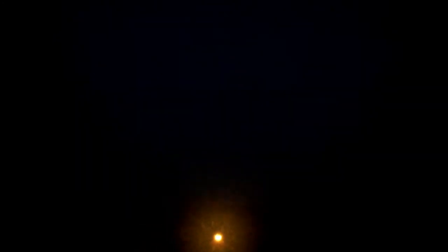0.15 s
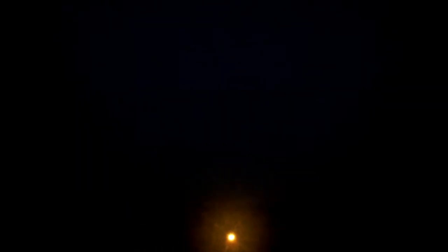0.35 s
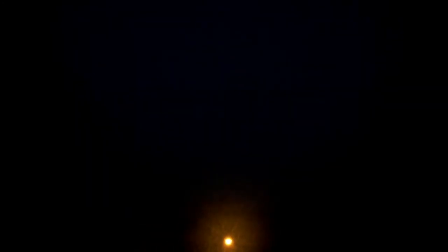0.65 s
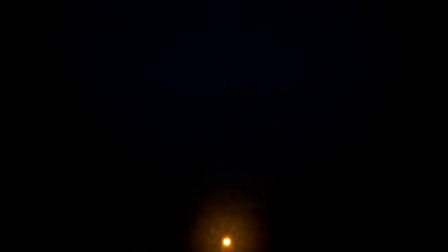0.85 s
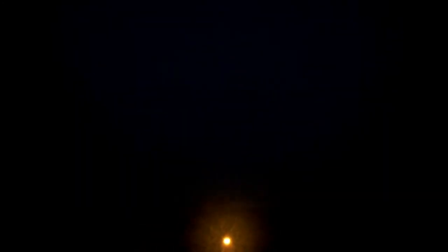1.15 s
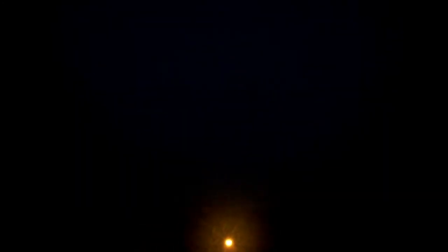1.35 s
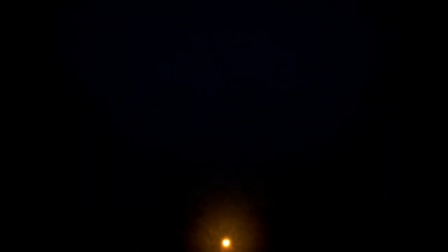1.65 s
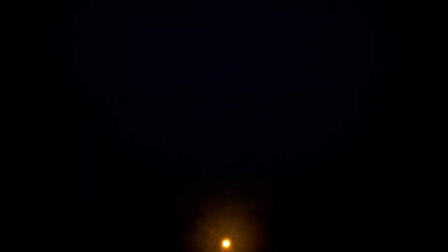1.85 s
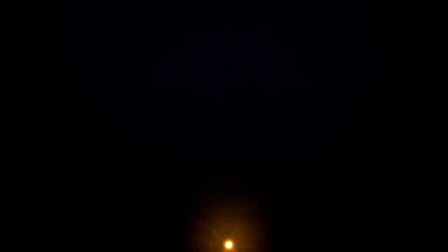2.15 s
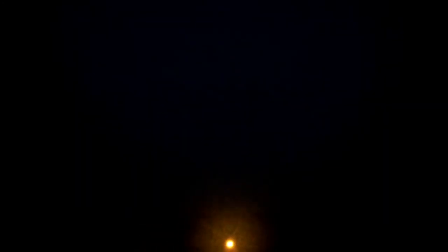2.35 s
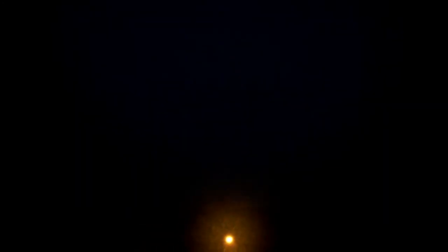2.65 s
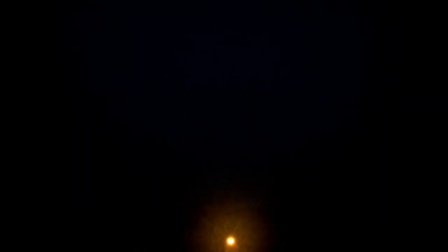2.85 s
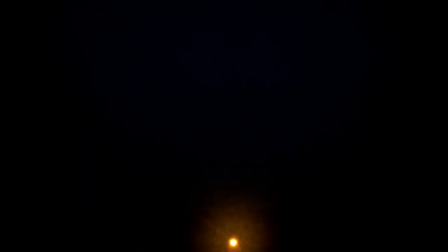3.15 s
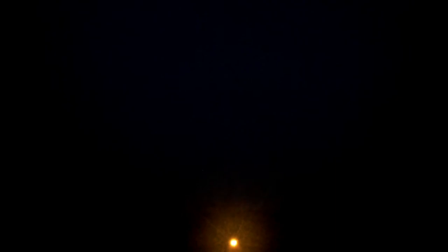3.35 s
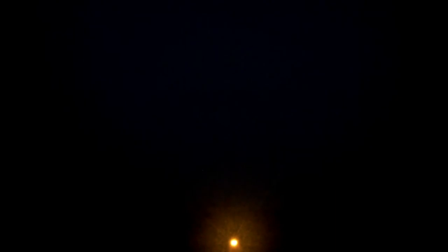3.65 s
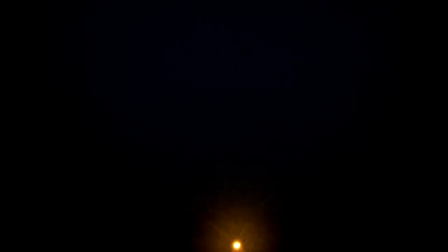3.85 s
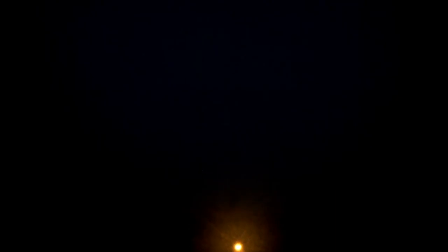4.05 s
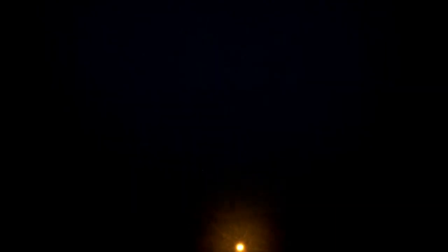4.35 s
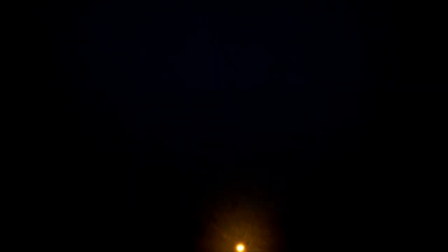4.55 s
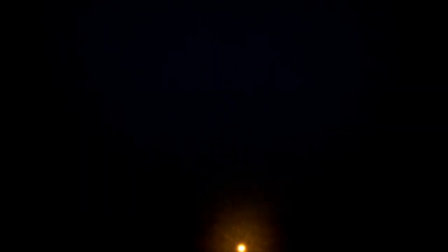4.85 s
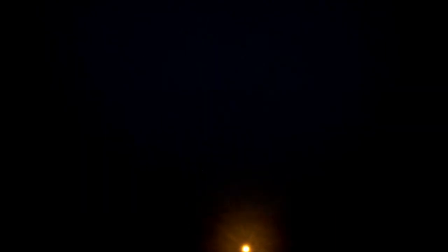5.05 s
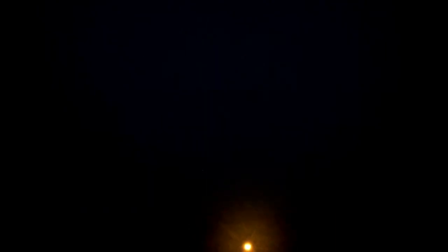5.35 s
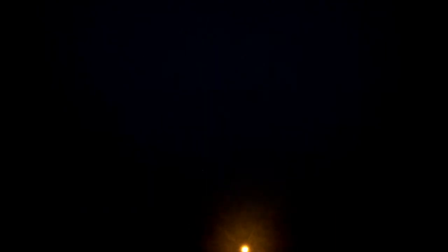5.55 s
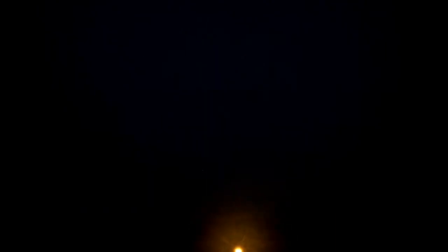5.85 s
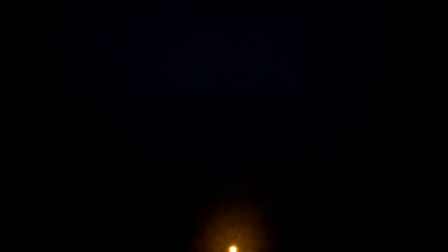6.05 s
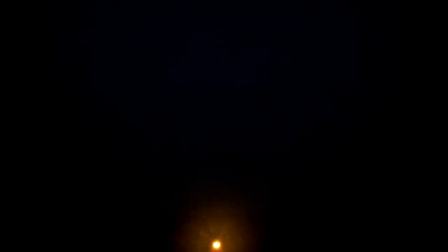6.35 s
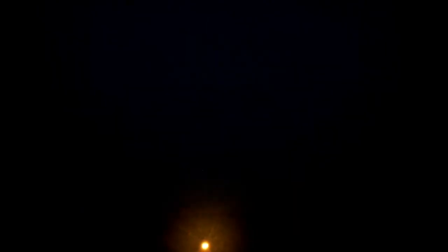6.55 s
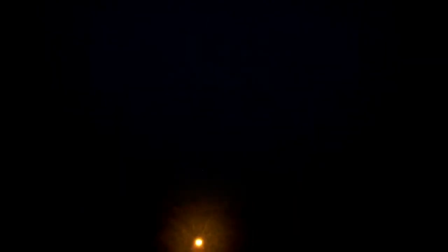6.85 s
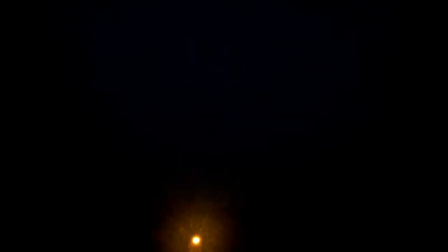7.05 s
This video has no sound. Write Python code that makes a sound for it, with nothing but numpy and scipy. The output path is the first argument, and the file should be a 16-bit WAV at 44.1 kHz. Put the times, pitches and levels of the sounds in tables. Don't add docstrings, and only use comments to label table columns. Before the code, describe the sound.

For about seven seconds, steady rain falls outdoors at night, picked up by a small handheld microphone, essentially mono. The bed is an even, slightly resonant hiss of far drops with dense, fine crackling from nearer ones. Single close drops tick sharply above it: a pair near 0.2, a clear one at 1.7, several between 2.2 and 3.6, more from 4.3 to 5.7, and a cluster after 6.1, some bright, some dull. At 0.9 a finger knocks the case: a very loud, short, clipped thump with a brief hollow ring and small release click. Soft low grip bumps follow around 1.3 to 1.4, with fainter nudges near 1.7, 3.2 and 4.2. Deep wind rumble swells briefly and irregularly underneath, strongest in the first couple of seconds. Near 7.1 the case rocks gently again with a dull last tap as the rain eases barely perceptibly.

```python
import sys
import numpy as np
from scipy import signal
from scipy.fft import rfft, irfft
from scipy.io import wavfile
from scipy.ndimage import uniform_filter1d

SR = 44100
rng = np.random.default_rng(int(sys.argv[2]) if len(sys.argv) > 2 else 0)


def voltage_ratio(level):
    return 10 ** (np.asarray(level, float) / 20)


def persist_wave(psi):
    counts = np.round(np.clip(psi, -1, 1) * 32767).astype(np.int16)
    wavfile.write(sys.argv[1], SR, np.atleast_2d(counts).T)


N = 317079

# time in seconds, level in dB.
SHOWER_LEVEL = [
    (0.0, -33),
    (0.46, -33.5),
    (2.76, -33),
    (6.85, -33),
    (7.19, -34),
]
# low edge in Hz, high edge in Hz, splash decay in ms, splash level in dB.
DROP_REGISTERS = [
    (1300, 4200, 1.5, -17.0),
    (4200, 8600, 1.2, -18.0),
    (8600, 14500, .7, -24.0),
]
# time in seconds, peak in dB, brightness in dB.
CLOSE_DROPS = [(0.1655, -16.7, 2), (0.1709, -15.0, 3), (1.6837, -13.3, 0), (1.6867, -19.2, -6),
               (2.1708, -17.4, -11), (2.5509, -17.3, -7), (2.7246, -15.2, -9), (2.7896, -15.7, -1),
               (3.1452, -16.2, -11), (3.4891, -19.2, -5), (3.4967, -18.9, -19), (3.5749, -18.5, -9),
               (4.2675, -18.3, -15), (4.4941, -19.2, -6), (4.4975, -17.1, -12), (4.5396, -19.0, -10),
               (5.12, -19.2, -9), (5.1784, -19.2, -2), (5.4519, -19.0, 3), (5.7434, -18.1, -6),
               (6.1544, -15.4, -4), (6.2545, -15.3, -4), (6.5915, -19.2, -9), (6.6088, -18.0, 0),
               (6.6456, -17.3, -19), (6.901, -22.0, -28), (6.917, -22.0, -30), (6.924, -22.0, -30),
               (7.0698, -18.7, 4), (7.1055, -17.3, 8)]
# frequency in Hz, level in dB.
PORT_COLOUR = [(120, -85.5), (640, -87.5), (840, -75), (1200, -80), (1930, -69.5), (3100, -77.5),
               (5400, -76.5), (6600, -69), (7350, -71), (8750, -79), (9500, -73.5), (11500, -77),
               (13800, -86), (15600, -90.5)]
# start in seconds, pressure (1 = full scale), rise in ms, fall in ms, case ring 0-1.
FINGER_KNOCK = [
    (.8957, -.2, 1.7, 1.0, 0.),
    (.8969, -2.1, 1.6, 5.2, .27),
    (.9016, -.28, 1.5, 4.6, 0.),
    (.9225, .24, 4.5, 42.0, 0.),
    (.9245, .035, .8, 1.0, .9),
]
# start in seconds, pressure (1 = full scale), length in ms.
GRIP_NUDGES = [
    (.252, -.1, 20),
    (1.370, .15, 8),
    (1.383, .07, 8),
    (1.389, .08, 7),
    (1.395, .06, 13),
    (1.404, -.1, 18),
    (1.669, -.08, 14),
    (3.245, .03, 16),
    (4.194, .06, 13),
]
# start in seconds, pressure (1 = full scale), case ring (ratio).
LIGHT_TAPS = [
    (.2475, -.024, .9),
    (1.289, .002, 5.0),
    (1.328, .002, 8.0),
    (4.93, .002, 6.0),
    (6.254, .004, 2.0),
    (7.188, -.025, .3),
]
# start in seconds, strength (ratio).
CASE_ROCKS = [
    (1.319, 1.),
    (7.125, .75),
]
# frequency in Hz, level in dB, 60 dB decay in seconds.
CASE_MODES = [
    (328, -12, 0.034),
    (580, -12, 0.044),
    (816, 6.5, 0.018),
    (1100, 1.5, 0.012),
    (1322, 5.5, 0.02),
]
# centre in seconds, rumble in dB, length in seconds, buffeting in dB.
WIND_GUSTS = [(0.082, -27.5, 0.1, -56), (0.24, -29, .13, -46), (0.448, -24.5, 0.023, -41),
              (0.618, -24, 0.16, -53), (0.804, -28, 0.23, -54), (1.19, -43, 0.059, -46),
              (1.28, -24.5, 0.12, -45), (1.607, -27, 0.12, -57), (1.67, -40, .05, -40),
              (1.863, -32.5, 0.25, -60), (2.102, -21, 0.068, -61), (2.335, -23, 0.11, -49),
              (2.65, -35, .15, -62), (3.062, -32.5, 0.07, -46), (3.287, -29.5, 0.14, -51),
              (3.478, -27.5, 0.04, -59), (4.198, -31, 0.1, -52), (4.923, -26.5, 0.12, -50),
              (5.44, -30, 0.11, -59), (5.58, -29.5, 0.12, -62), (6.064, -30, 0.073, -58),
              (6.25, -29.5, 0.27, -62), (6.75, -27, 0.093, -52), (6.904, -36, .08, -65),
              (7.043, -32, 0.1, -60), (7.123, -29, .04, -62), (7.19, -34, .03, -44)]

LESSER_COUNT, LESSER_PEAK_DB, LESSER_BRIGHT_DB, LESSER_SPREAD_DB = 36, -20.0, -7.0, 6.0
NUDGE_RISE_RATIO = 0.55
TAP_RISE_MS, TAP_FALL_MS = 1.0, 1.6
ROCK_HALF_S, ROCK_PULL, ROCK_PUSH = 0.0135, -0.075, 0.21
AIR_LEAK_HZ = 5.5
CALM_RUMBLE_DB, CALM_BUFFET_DB, RUMBLE_WANDER_DB, BUFFET_WANDER_DB = -33.5, -51.5, 1, 3
COUPLING_HZ, MISMATCH_DB, SELF_NOISE_DB = 4.5, -0.035, -54.5
PORT_FFT_SIZE = 8192


def rain(response):
    near = patter(per_s=1500.0, spread_db=2.5, clump_db=1.5, colour_db=2.5)
    fall = hiss(flicker_db=0.65) + voltage_ratio(-7.5) * near
    time_s, level_db = np.transpose(SHOWER_LEVEL)
    shower_db = np.interp(np.arange(N) / SR, time_s, level_db)
    return voltage_ratio(shower_db + 0.11) * rms_one(signal.fftconvolve(fall, response)[:N])


def hiss(flicker_db):
    white = rng.standard_normal((2, N))
    low = cut(white[0], 4160, "low", order=2) * voltage_ratio(flicker_db * drift(16.0))
    high = cut(white[1], 4500, "high", order=2) * voltage_ratio(flicker_db * drift(26.0))
    return (low + high) * voltage_ratio(0.12 * drift(5.9))


def patter(per_s, spread_db, clump_db, colour_db):
    born = rng.random(N) < per_s * voltage_ratio(clump_db * drift(9.0)) / SR
    size_db = spread_db * rng.exponential(1, N) + colour_db * rng.standard_normal((3, N))
    size_db = np.minimum(size_db, 11.5)
    register_db = [[-5.0], [-1.0], [-1.5]]
    return rms_one(splash(born * rng.choice([-1, 1], N), size_db + register_db))


def close_drops(response):
    time_s, peak_db, bright_db = drop_rows()
    at = (time_s * SR).astype(int)
    clicks, gains_db = np.zeros(N), np.zeros((3, N))
    clicks[at] = voltage_ratio(peak_db + 4.0) * rng.choice([-1, 1], len(at))
    low_db = -13.0 - 0.63 * np.minimum(bright_db + 15.0, 0)
    middle_db = -0.55 * np.maximum(bright_db + 5.0, 0)
    top_db = -1.5 + 1.1 * np.minimum(bright_db, 1.5)
    gains_db[:, at] = [low_db, middle_db, top_db]
    peak_response = response / np.abs(response).max()
    return signal.fftconvolve(splash(clicks, gains_db), peak_response)[:N]


def drop_rows():
    time_s = rng.random(LESSER_COUNT) * (N - 1) / SR
    bright_db = LESSER_BRIGHT_DB + LESSER_SPREAD_DB * rng.standard_normal(LESSER_COUNT)
    peak_db = LESSER_PEAK_DB - 0.5 + rng.random(LESSER_COUNT)
    return np.hstack([np.transpose(CLOSE_DROPS), [time_s, peak_db, bright_db]])


def splash(clicks, gains_db):
    out = 0
    for (low_hz, high_hz, decay_ms, splash_db), gain_db in zip(DROP_REGISTERS, gains_db):
        tail_ms = np.arange(256) * 1000 / SR
        tail = voltage_ratio(splash_db) * rng.standard_normal(256) * np.exp(-tail_ms / decay_ms)
        tail[0] = 1
        spatter = signal.fftconvolve(clicks * voltage_ratio(gain_db), tail)[:N]
        out = out + cut(spatter, [low_hz, high_hz], "band", order=1)
    return out


def port_response():
    hz, db = np.transpose(PORT_COLOUR)
    half = PORT_FFT_SIZE // 2
    grid_hz = np.arange(half + 1) * SR / PORT_FFT_SIZE + 1
    level_db = np.interp(np.log(grid_hz), np.log(hz), db)
    broad_db = uniform_filter1d(level_db, size=70)
    narrow_db = uniform_filter1d(level_db, size=14)
    level_db = np.where(grid_hz > 3500, broad_db, narrow_db)
    cepstrum = irfft(level_db * np.log(10) / 20)
    cepstrum[1:half] *= 2
    cepstrum[half + 1:] = 0
    response = irfft(np.exp(rfft(cepstrum)))[:half // 2]
    return response / np.sqrt(np.sum(response ** 2))


def handling():
    t, squeeze, release = np.arange(N) / SR, np.zeros(N), np.full(N, 1e-18)
    for start_s, pressure, rise_ms, fall_ms, ring in pushes():
        top_s = start_s + rise_ms / 1000
        end_s = start_s + (rise_ms + fall_ms) / 1000
        phase = np.interp(t, [start_s, top_s, end_s], [0, np.pi, 2 * np.pi])
        squeeze += pressure * (1 - np.cos(phase)) / 2
        release_s = start_s + (rise_ms + 0.6 * fall_ms) / 1000
        release[min(int(release_s * SR), N - 1)] = -pressure * ring
    release = cut(release, 3200, "low", order=2)
    out = cut(squeeze, AIR_LEAK_HZ, "high", order=1)
    for hz, level_db, t60_s in CASE_MODES:
        radius, angle = voltage_ratio(-60 / (t60_s * SR)), 2 * np.pi * hz / SR
        poles = [1, -2 * radius * np.cos(angle), radius * radius]
        out += voltage_ratio(level_db - 16.0) * signal.lfilter([0, np.sin(angle)], poles, release)
    return out


def pushes():
    half_ms = ROCK_HALF_S * 1000
    rows = list(FINGER_KNOCK)
    for start_s, strength in CASE_ROCKS:
        for k, pressure in enumerate([ROCK_PULL, ROCK_PUSH, ROCK_PULL, ROCK_PUSH]):
            rows.append((start_s + k * ROCK_HALF_S, strength * pressure, 0.8 * half_ms, 0.65 * half_ms, 0.0))
    for start_s, pressure, length_ms in GRIP_NUDGES:
        rise_ms = NUDGE_RISE_RATIO * length_ms
        rows.append((start_s, pressure, rise_ms, length_ms - rise_ms, 0.0))
    for start_s, pressure, ring in LIGHT_TAPS:
        rows.append((start_s, pressure, TAP_RISE_MS, TAP_FALL_MS, ring))
    return rows


def wind():
    rumble_db, buffet_db = gusts()
    rumble = voltage_ratio(rumble_db - 1.0) * lumpy(6.7, 42.0, order=5, even_s=0.122)
    return rumble + voltage_ratio(buffet_db - 6.0) * lumpy(70.0, 72.0, order=2, even_s=0.088)


def gusts():
    t = np.arange(0, N + 64, 64) / SR
    rumble, buffet = np.zeros(len(t)), np.zeros(len(t))
    for centre_s, rumble_db, length_s, buffet_db in WIND_GUSTS:
        bell = np.exp(-(2.4 * (t - centre_s) / length_s) ** 2)
        rumble += voltage_ratio(2 * rumble_db) * bell
        buffet += voltage_ratio(2 * buffet_db) * bell
    full = np.arange(N) / SR
    calm_rumble = voltage_ratio(2 * (CALM_RUMBLE_DB + RUMBLE_WANDER_DB * drift(18.0)))
    calm_buffet = voltage_ratio(2 * (CALM_BUFFET_DB + BUFFET_WANDER_DB * drift(7.8)))
    rumble = np.interp(full, t, rumble) + calm_rumble
    buffet = np.interp(full, t, buffet) + calm_buffet
    return 10 * np.log10(rumble), 10 * np.log10(buffet)


def lumpy(low_hz, high_hz, order, even_s):
    noise = cut(rng.standard_normal(N + SR), low_hz, "high", order=2)
    noise = cut(noise, high_hz, "low", order)[SR:]
    power = uniform_filter1d(noise ** 2, int(even_s * SR))
    return noise / np.sqrt(power + 0.19 * np.mean(noise ** 2))


def drift(rate_hz):
    lead = rng.standard_normal(N + SR)
    return rms_one(cut(lead, rate_hz, "low", order=2)[SR:])


def cut(x, hz, kind, order):
    return signal.sosfilt(signal.butter(order, hz, kind, fs=SR, output="sos"), x)


def rms_one(x):
    return x / np.sqrt(np.mean(x ** 2) + 1e-20)


def scene():
    response = port_response()
    mono = rain(response) + close_drops(response) + handling() + wind()
    return np.array([mono, mono])


def roll_off(x):
    return signal.sosfilt(signal.butter(12, 15760, fs=SR, output="sos"), x)


def record(dry):
    clipped = np.clip(dry, -0.985, 0.985)
    coupled = cut(clipped, COUPLING_HZ, "high", order=1) * voltage_ratio([[MISMATCH_DB], [-MISMATCH_DB]])
    noisy = coupled + voltage_ratio(SELF_NOISE_DB) * rng.standard_normal((2, N))
    return roll_off(noisy)


dry = scene()
out = record(dry)
persist_wave(out)
```